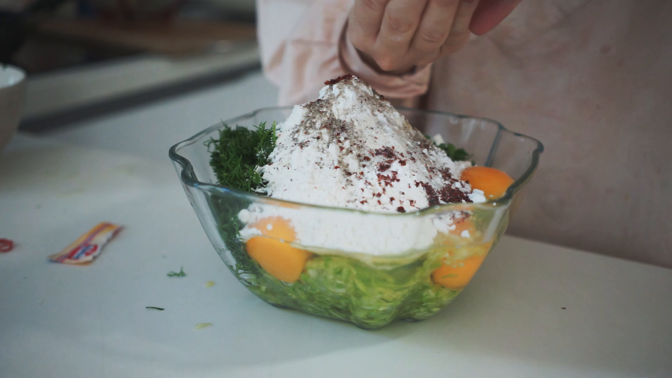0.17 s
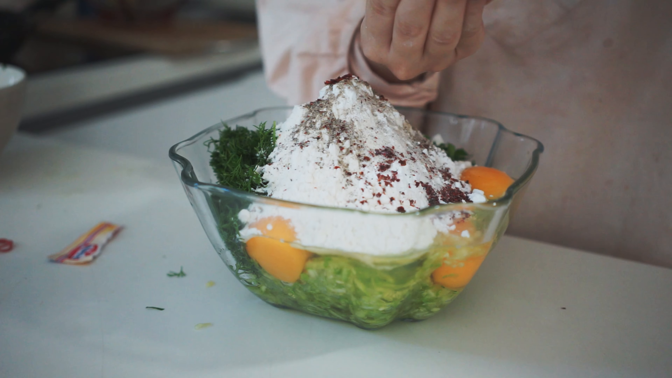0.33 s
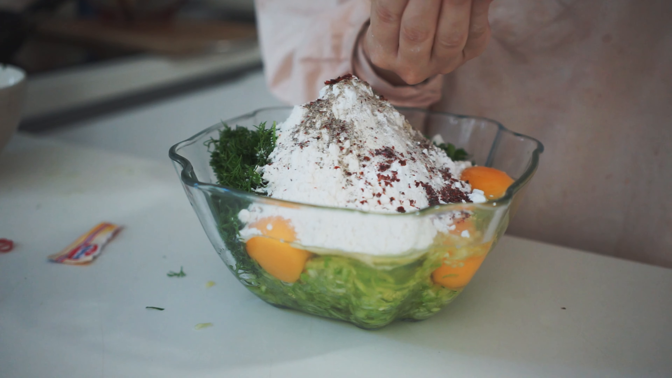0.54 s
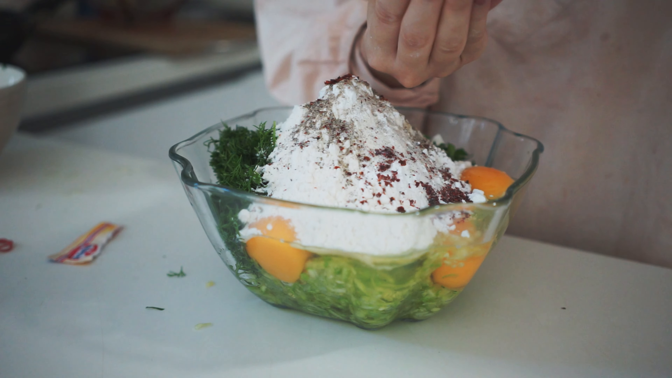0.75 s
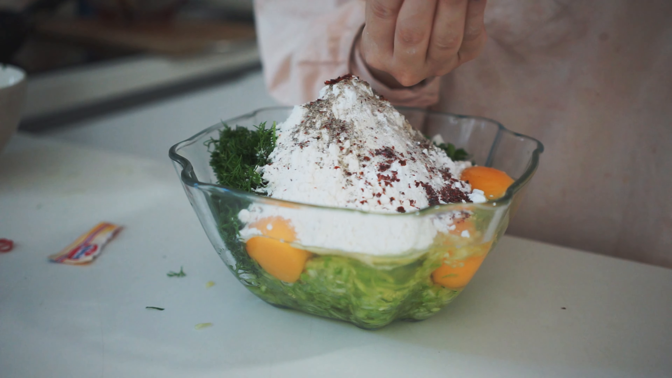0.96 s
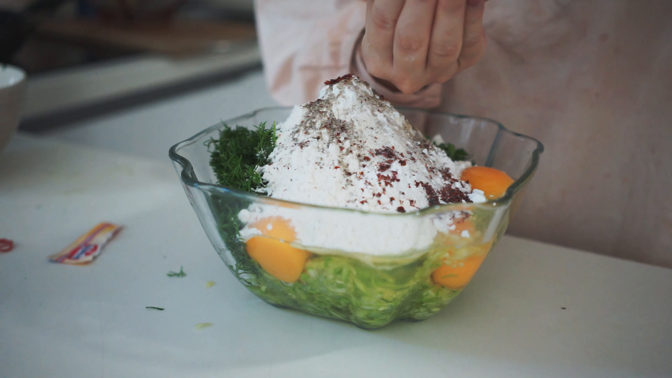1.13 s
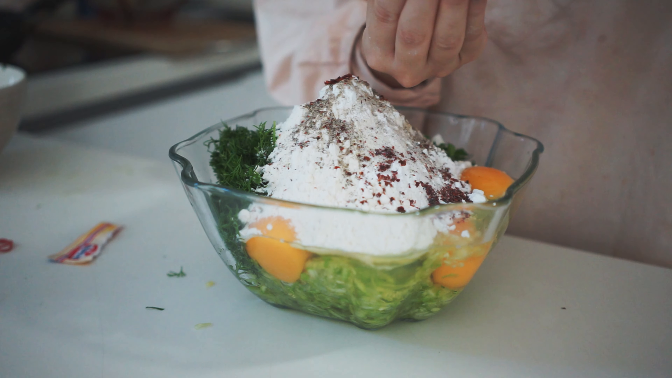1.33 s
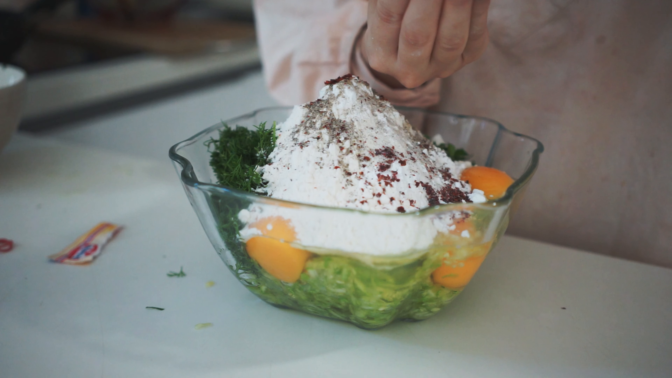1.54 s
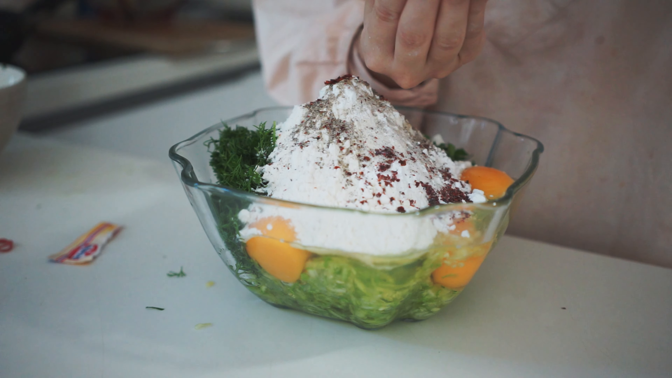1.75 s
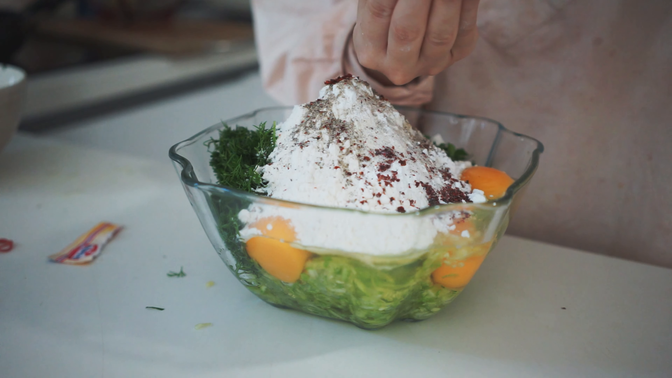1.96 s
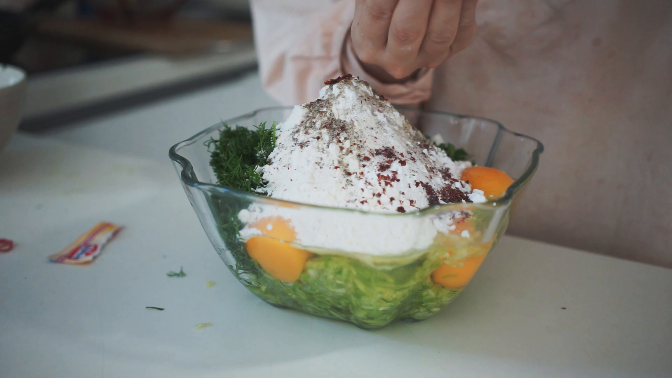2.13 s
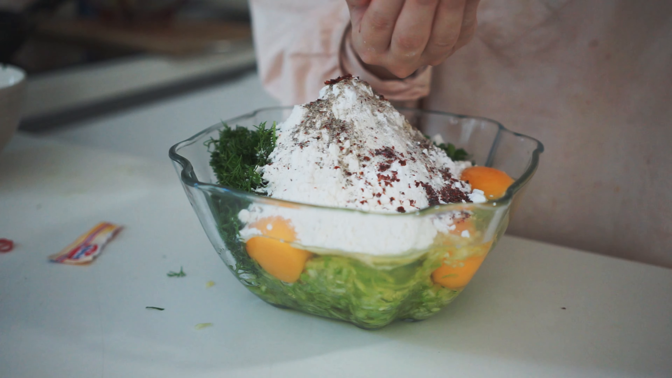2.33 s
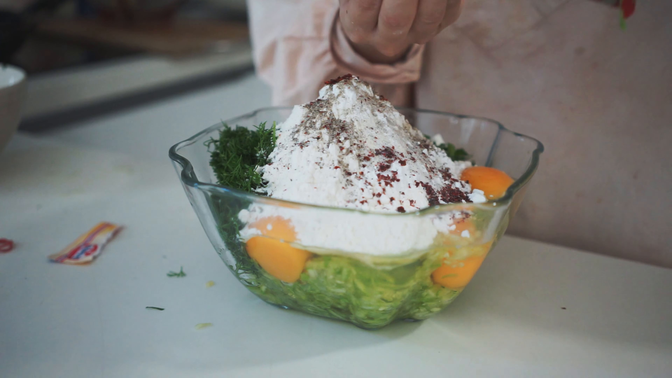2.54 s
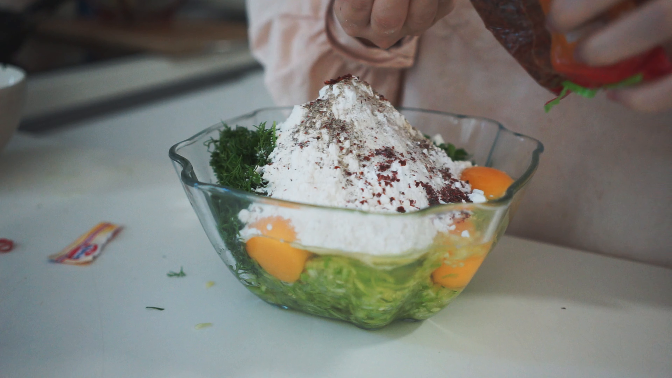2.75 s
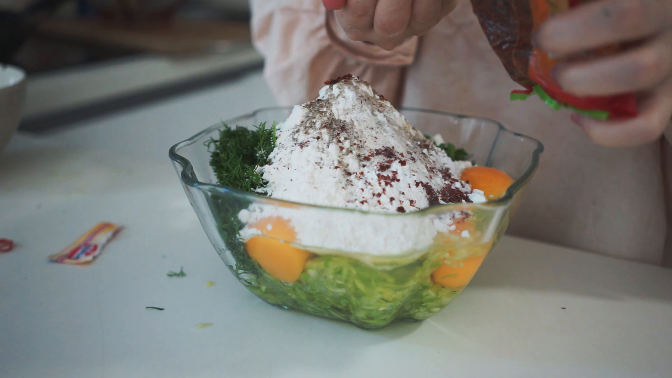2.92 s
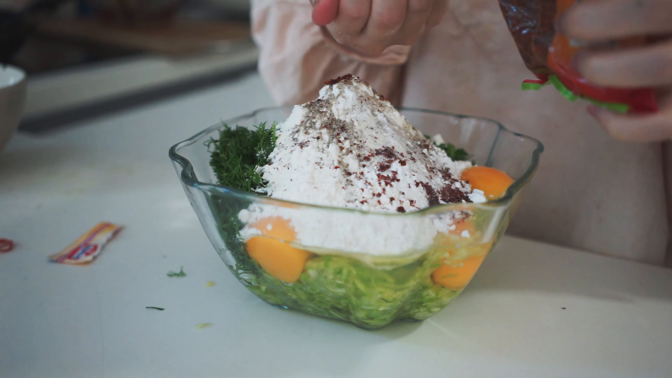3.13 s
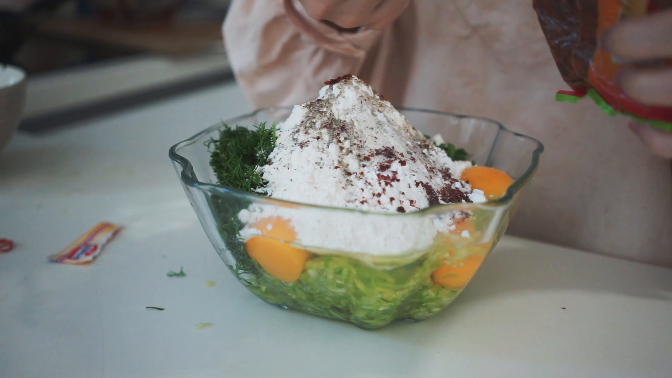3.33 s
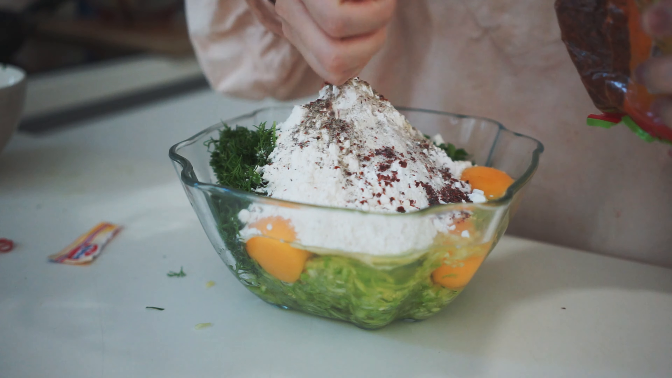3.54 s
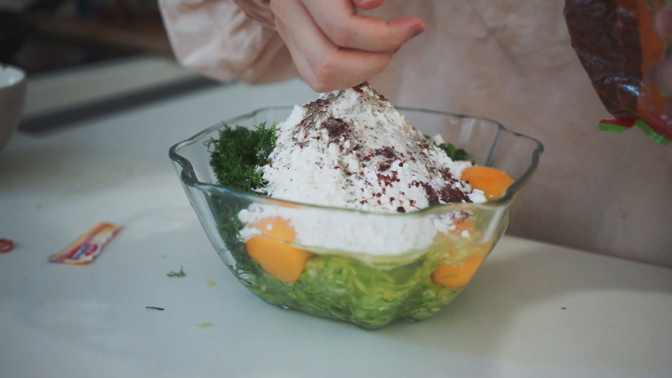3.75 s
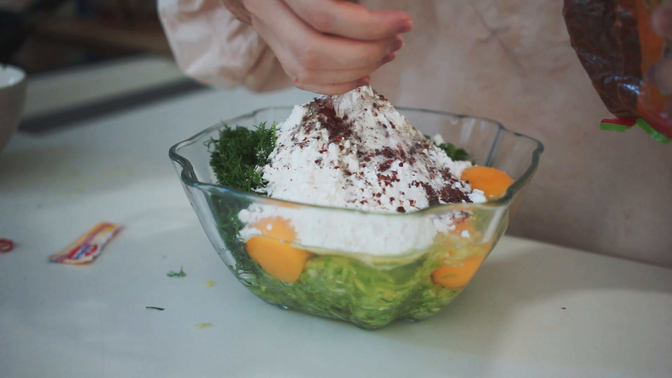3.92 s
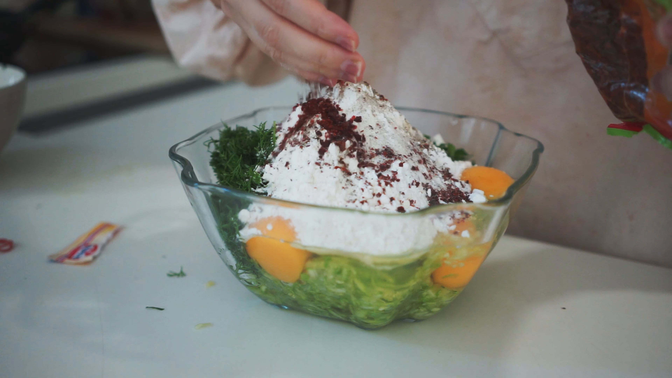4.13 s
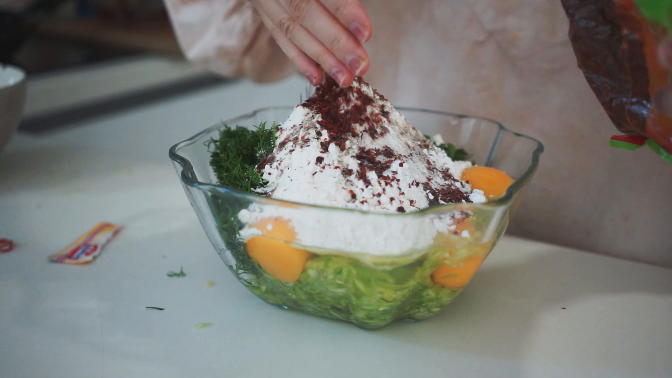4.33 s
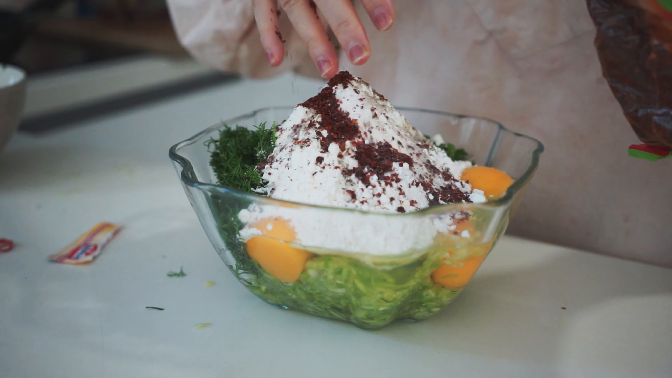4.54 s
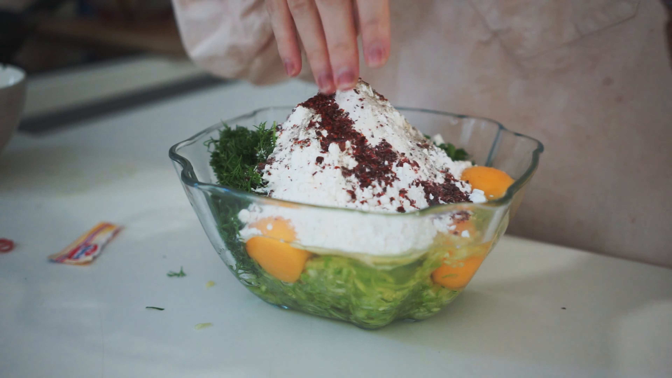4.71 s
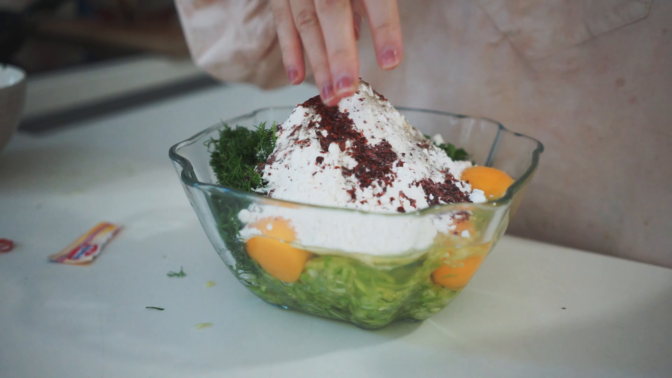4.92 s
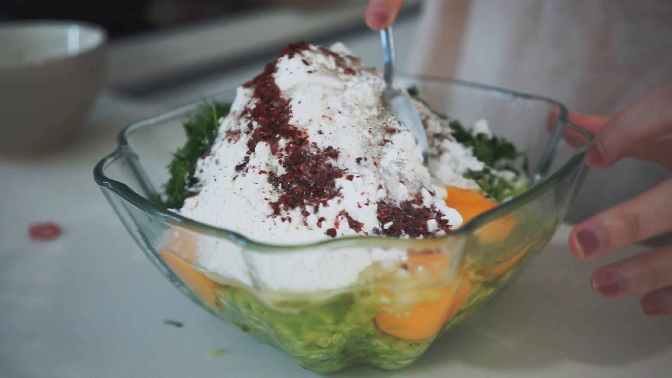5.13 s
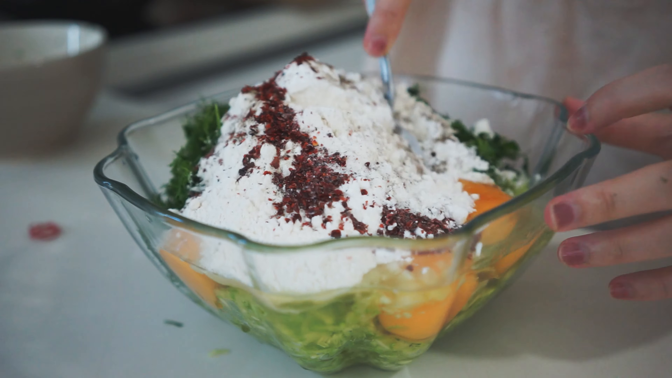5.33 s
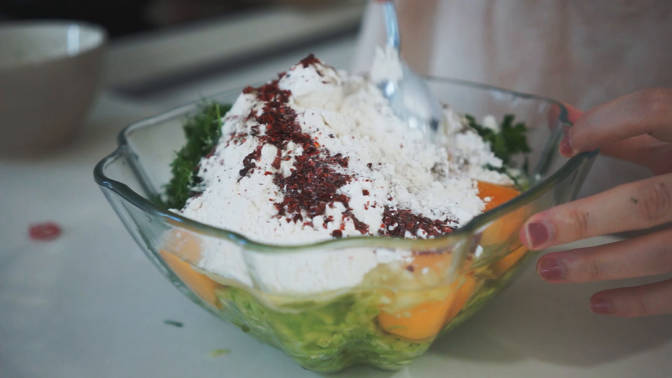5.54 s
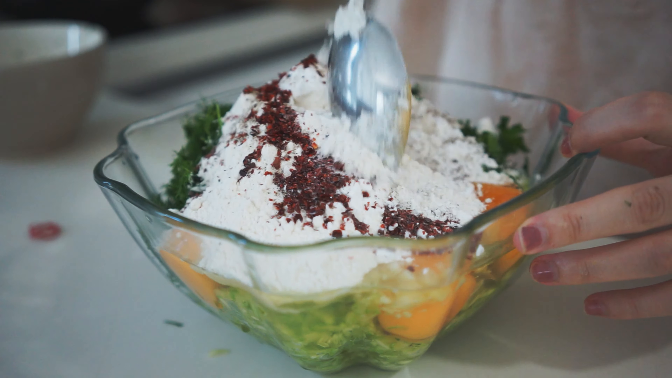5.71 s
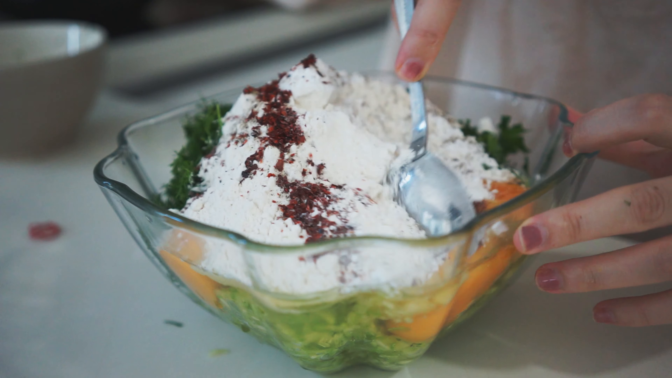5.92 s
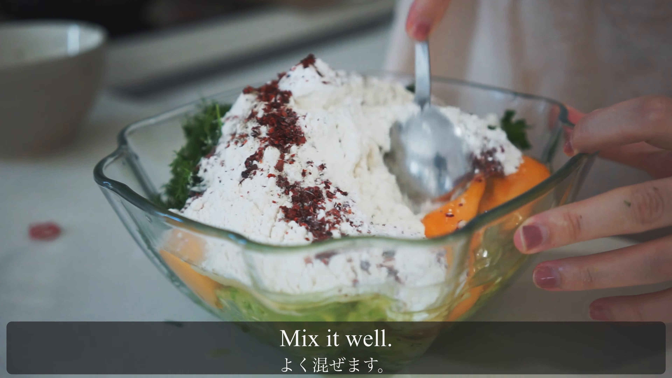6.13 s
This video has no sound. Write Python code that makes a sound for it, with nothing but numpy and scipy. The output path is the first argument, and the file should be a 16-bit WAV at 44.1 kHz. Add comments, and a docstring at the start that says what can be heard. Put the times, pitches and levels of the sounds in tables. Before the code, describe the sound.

Brittle dry leaves are rubbed between fingers close to a stereo microphone, slightly brighter on the right, over soft room air and a faint low hum that soon fades. The rubbing dwindles, a short grainy pour comes from a bag, then almost nothing but tiny distant contacts. A dry crunch precedes dull knocks of a spoon against a loaded glass bowl, with short room echo and a last hard clink.

```python
"""In a small kitchen, fingers crumble dry flakes over a bowl of flour, then more flakes slide out of a bag.
Crackle is thousands of tiny random fractures; bigger flakes each ring for a cycle or two.
A few faint ticks and chinks, heard only as reflections, come from across the room, over steady air and a low hum.
A spoon bumps the heavy glass bowl on the counter, then ploughs through the mixture and strikes the bare glass:
each blow sets off dying sine tones and bursts of fading noise."""
import sys
import numpy as np
from scipy import signal
from scipy.fft import rfft, irfft
from scipy.io import wavfile
from scipy.ndimage import uniform_filter1d

SR = 44100
rng = np.random.default_rng(int(sys.argv[2]) if len(sys.argv) > 2 else 0)


def int16_out(signal):
    """Quantize to a 16-bit WAV file."""
    q = np.round(np.clip(np.atleast_2d(signal).T, -1, 1) * 32767)
    wavfile.write(sys.argv[1], SR, q.astype(np.int16))


N = 276495  # length in samples

# Levels in dB are relative: later mixing steps may raise or lower them.
# The colour of the steady room noise. Each row: frequency in Hz, level in dB per Hz.
AIR_COLOUR = [(15, -39), (25, -10.5), (102, -4), (190, -5.5), (217, -10.5), (242, -8.5), (405, -12),
              (591, -12.5), (677, -13.5), (734, -14), (1330, -17), (2110, -19.5), (2480, -20.5),
              (3250, -21), (16000, -28.5)]
AIR_DB = -56
# How alike the room noise is at left and right. Each row: frequency in Hz, likeness (1 = the same).
AIR_LIKENESS = [(60, 0.93), (120, 1), (220, 0.8), (400, 0.46), (1500, 0.16), (15000, 0.23)]
# A low hum that swells once and then dies away. Each row: time in seconds, level in dB.
HUM_LEVEL = [(0, -60), (.8, -59.5), (1.27, -54), (1.4, -63), (2.3, -67.5), (6.3, -85)]
HUM_HZ = 61
# How fast the room's echo dies. Each row: frequency in Hz, time to fall by 60 dB in seconds.
ROOM_T60 = [(100, 0.19), (300, 0.42), (1000, 0.37), (3000, 0.38), (8000, 0.39), (16000, 0.23)]
EDGE_HZ = 16100  # the top of the treble

# Faint ticks far off in the room. Each row: start in seconds, strength in dB, centre in Hz, width in octaves.
FAR_TICKS = [(3.780, -15, 7500, 1.15), (4.230, -13.5, 3600, 1.1), (4.4004, -11.5, 4370, 1.32),
             (4.505, -16.5, 4130, 1.24), (4.62, -22, 3930, 3.3)]
# The colour the far ticks share. Each row: frequency in Hz, level in dB.
FAR_TICK_COLOUR = [(700, 10), (1300, 5), (2500, -1), (4000, -2), (5600, 3), (6800, -5), (8800, -1.5),
                   (10800, -2), (13000, -1), (16000, -7)]
# Two light chinks far off. Each row: start in seconds, strength in dB.
FAR_CHINKS = [(5.552, -19.5), (5.633, -16)]
# The colour of the chinks, with a few narrow peaks. Each row: frequency in Hz, level in dB.
CHINK_COLOUR = [(300, -42), (3400, -13), (4100, -1), (4900, -12), (5800, -2), (6700, -14), (8200, 4),
                (9200, -5), (10200, -6), (11300, -13), (13000, -2), (14300, -13), (15400, -5), (16500, -15)]
# Soft bumps of arm and bag against the counter.
# Each row: start in seconds, peak level in dB, frequency in Hz, length in seconds.
BUMPS = [(3.82, -52, 169, 0.13), (3.842, -54, 256, 0.08), (4.272, -54, 53, .22), (4.279, -58, 91.3, 0.29)]

# The spoon meets the bowl.
# Each row: start in seconds, thud in dB, hardness of the blow in Hz, glass clink in dB.
KNOCKS = [(5.2596, -3.5, 1240, -34), (5.2963, -6.5, 497, -43), (5.318, -6.5, 198, -50),
          (5.3725, 10.5, 1380, -14.5), (5.9167, 1, 930, -7), (6.258, -5.5, 3400, 8.5)]
# Tones of the full bowl on the counter. Each row: frequency in Hz, level in dB, time to fall by 60 dB in seconds.
BOWL_MODES = [(87, -6.5, 0.19), (99, 0.5, 0.13), (141.3, -1.5, 0.39), (217, -8, 0.19), (259.7, 2.5, 0.21),
              (296, 3, 0.12), (353, -1, 0.084), (390, 3.5, 0.18), (522, 4, 0.26), (653, 1, 0.12),
              (690, -2, 0.1), (798, 1, 0.17), (850, -4, 0.15), (990, 2.5, 0.075), (1135, -4.5, 0.19),
              (1253, -4, 0.22), (1370, -5, 0.11), (1534, 2.5, 0.14), (1950, -5, 0.22), (2105, 7.5, 0.059)]
# Tones of the steel spoon against the glass wall.
# Each row: frequency in Hz, level in dB, time to fall by 60 dB in seconds.
GLASS_MODES = [(992, -1, 0.047), (2050, 14, 0.011), (2980, -9.5, 0.12), (3394, 2.5, 0.0087),
               (4760, 0, 0.038), (5210, 1, 0.023), (6200, -2, 0.023), (7680, -5, 0.0081),
               (9600, -24, 0.015)]
# The colour of the dense rumble through the counter. Each row: frequency in Hz, level in dB.
COUNTER_COLOUR = [(40, -21), (75, -2), (130, 2.5), (250, 5.5), (400, -2), (700, -4.5), (1500, -4),
                  (2300, -3), (3500, -8), (8000, -74)]
# The clatter of the many weaker glass tones. Each row: frequency in Hz, level in dB.
CLATTER_COLOUR = [(300,-30), (1000,5), (2000,3.5), (3100,7.5), (3900,-12), (4700,-2), (6500,0), (7400,-9),
                  (16000,-27)]
CLINK_REACH = 4.3  # the clink reaches this many times higher than the blow's hardness

# Flakes sliding out of the bag. Each row: time in seconds, level in dB.
POUR_LEVEL = [(2.6, -64), (2.68, -51), (2.8, -49), (3.01, -52), (3.045, -49), (3.16, -45), (3.3, -53.5),
              (3.55, -61.5), (3.72, -84)]
# The bag's hollow colour. Each row: frequency in Hz, level in dB.
BAG_COLOUR = [(150,-5.5), (700,-12), (1400,-10.5), (1900,0), (2400,-1.5), (3400,-2.5), (4700,-0.5),
              (7500,-1), (11000,-1.5), (16000,-6)]
# A short dry crunch of crackle that sags for 40 ms and then is cut off.
CUT_CRUNCH_S, CUT_CRUNCH_LENGTH_S, CUT_CRUNCH_EDGE_S = 5.083, .04, .003
CUT_CRUNCH_DB, CUT_CRUNCH_SAG_DB_PER_S = -40, 232
# The colour of this crunch. Each row: frequency in Hz, level in dB.
CUT_CRUNCH_COLOUR = [(500,-35), (1600,-10), (2100,2), (2800,-0.5), (3500,-8), (4600,-2), (6500,-4.5),
                     (9000,-13), (16000,-21)]

# Steady rubbing, which thins out as the fingers empty. Each row: time in seconds, level in dB.
RUB_LEVEL = [(0, -41), (.08, -52), (.3, -42.5), (.5, -40), (.78, -43), (1.14, -42.5), (1.22, -48.5),
             (1.48, -47), (1.68, -55), (2.15, -64.5), (2.45, -62), (2.7, -78)]
# Harder squeezes of the fingers. Each row: time in seconds, level in dB, fizz above that level in dB.
SQUEEZES = [(0.115, -40.5, -6), (0.595, -43.5, 1.5), (0.69, -42, 2.5), (0.83, -44, -1), (0.885, -55, 4),
            (1.40, -42.5, -8), (1.51, -51, 3), (1.613, -44.5, 4.5), (1.723, -42.5, -5), (1.83, -46, -4.5),
            (1.942, -47.5, -6), (2.105, -51.5, -3)]
SQUEEZE_RISE_S, SQUEEZE_HOLD_S, SQUEEZE_T60 = 0.031, 0.034, .16  # seconds
FIZZ_DB, CRUNCH_DB = -3.5, -9  # compared with the rustle of the rubbing
FULL_DB, CRUNCH_FOLLOWS = -44, 0.85  # level with full fingers; dB the crunch falls per dB of rustle
# The spoon ploughs through the mixture, louder until just before it meets the glass.
PLOUGH_S, PLOUGH_RISE_S, PLOUGH_DB, PLOUGH_FIZZ_DB, PLOUGH_CRUNCH_DB = 6.21, 0.11, -59.5, -7, 5
# The low part of the crackle. Each row: frequency in Hz, level in dB.
CRUNCH_COLOUR = [(50, -20), (120, 14.5), (200, 5.5), (350, -1), (500, -5.5), (750, -9.5), (1200, -1.5),
                 (1700, -8.5), (3000, -53.5)]
# The middle part of the crackle. Each row: frequency in Hz, level in dB.
RUSTLE_COLOUR = [(700, -29), (1300, -18.5), (1800, -5.5), (3000, -0.5), (5000, 1.5), (6500, 2.5),
                 (9000, -11.5)]
# The high part of the crackle. Each row: frequency in Hz, level in dB.
FIZZ_COLOUR = [(4500, -33.5), (7000, 5.5), (9500, -3), (12000, -5.5), (16000, -14.5)]

# Single snaps of breaking flakes, mostly loud, with a few faint ones late.
# Each row: start in seconds, strength in dB, ring in Hz, sharp tick compared with the ring in dB.
SINGLE_SNAPS = [(0.1143, -5, 1910, 9.5), (0.1291, -8, 3550, 3), (0.2552, -12, 3440, -18),
                (0.3751, -6, 4100, 9), (0.597, -3, 1960, 7.5), (0.6835, -12, 1550, -4),
                (0.6877, -6.5, 2870, 1), (0.8236, -6, 1350, 6), (0.8588, -3, 4060, -26),
                (0.885, 0, 3700, 3), (0.979, -6, 1570, -5), (1.1084, -7.5, 3570, -25),
                (1.1515, -8.5, 2690, -20), (1.1557, -12.5, 1260, -20), (1.4018, -9.5, 3100, -17),
                (1.4178, -7.5, 1230, 3), (1.4549, -6.5, 1660, -2), (1.467, -7.5, 10030, -10),
                (1.5003, -8.5, 4270, -22), (1.5191, -3, 4000, -5), (1.626, -11.5, 4360, -16),
                (1.8131, -13.5, 2740, -16), (1.926, -15.5, 3270, -25), (1.9882, -12.5, 1030, -5),
                (2.099, -8, 5200, -15), (2.2, -17.5, 9300, 1), (2.4837, -1.5, 4480, 1),
                (2.9265, -19, 2740, -17), (3.047, -16, 2260, -1), (3.1065, -19.5, 2410, -14),
                (4.1691, -26, 7100, -14), (5.0279, -27.5, 1830, -9), (5.0828, -22, 2330, -24),
                (5.2099, -26, 4420, -4)]
# The colour all breaking flakes share. Each row: frequency in Hz, level in dB.
SNAP_COLOUR = [(100, -2.5), (500, -3.5), (800, 1), (1400, 3.5), (3000, 0), (3700, -1.5), (4600, 0),
               (6200, 0), (9000, -1), (12000, -3.5), (16000, -10)]
# Smaller flakes break at random, the more weakly the quieter the crackle around them.
SMALL_PER_S, SMALL_DB, SMALL_SPREAD_DB = 25, -16, 3
SMALL_FOLLOWS = 0.56  # dB of strength per dB of crackle
SMALL_HZ, SMALL_OCTAVES, SMALL_TICK_DB = 4320, 0.41, -7.5  # ring, its scatter either way, sharp tick
SMALL_BAG_HZ, SMALL_BAG_DB = 2400, -8  # in the bag they ring lower and softer
# The hands as heard at the left, with less treble. Each row: frequency in Hz, level in dB.
LEFT_SHADE = [(200, 1), (700, -2), (1500, -4), (4000, -1.5), (9000, -8), (16000, -9)]


def gain_of(db):
    """Turns decibels into amplitude."""
    return 10 ** (np.asarray(db) / 20)


def evened(x):
    """Scales to an average (rms) strength of 1."""
    return x / np.sqrt(np.mean(x ** 2) + 1e-20)


def unit(x):
    """Scales to a total energy of 1."""
    return x / np.sqrt(np.sum(x ** 2) + 1e-20)


def read(points, hz):
    """Reads a table between its rows, on a log-frequency axis."""
    f, value = np.transpose(points)
    return np.interp(np.log(hz + 1), np.log(f + 1), value)


def coloured(x, points):
    """Filters by a colour table with minimum phase, so that nothing sounds before its cause."""
    size = 4096
    log_gain = np.log(gain_of(read(points, abs(np.fft.fftfreq(size, 1 / SR)))))
    response = np.exp(np.conj(signal.hilbert(log_gain)))
    taps = np.fft.ifft(response).real[:size // 2]
    return signal.oaconvolve(x, taps)[:len(x)]


def band(x, low_hz, high_hz, order):
    """Keeps what lies between two frequencies."""
    sections = signal.butter(order, [low_hz, high_hz], "band", fs=SR, output="sos")
    return signal.sosfilt(sections, x)


def add(mix, s, sound):
    """Mixes a sound in at time s."""
    part = mix[max(round(s * SR), 0):][:len(sound)]
    part += sound[:len(part)]


def fading(t, t60):
    """Falls by 60 dB in t60 seconds."""
    return np.exp(-np.log(1000) * t / t60)


def swell(s, rise_s, hold_s, t60):
    """Rises to full strength at time s, holds, then dies away."""
    t = np.arange(N) / SR - s
    return np.clip(1 + t / rise_s, 0, 1) ** 2 * fading(np.maximum(t - hold_s, 0), t60)


def course(rows):
    """Follows a table of times and levels as amplitude; next to silent after its last row."""
    return gain_of(np.interp(np.arange(N) / SR, *np.transpose(rows), right=-120))


def ring(modes, t):
    """Sounds struck tones, each a dying sine."""
    return sum(gain_of(db) * fading(t, t60) * np.sin(2 * np.pi * hz * t) for hz, db, t60 in modes)


def chip(hz, cycles, t):
    """A broken flake rings for a cycle or two; taking differences sharpens its start."""
    return unit(np.diff(np.exp(-t * hz / cycles) * np.sin(2 * np.pi * hz * t), prepend=0))


def crackle(per_s, spread_db, cycles):
    """Thousands of tiny fractures a second, mostly small, each with one of 24 pitches."""
    t, pitches = np.arange(256) / SR, np.geomspace(600, 14000, 24)
    out = np.zeros(N)
    for hz in pitches:
        sizes = gain_of(spread_db * np.minimum(rng.exponential(1, N), 5))
        happens = rng.random(N) < per_s / len(pitches) / SR
        breaks = sizes * rng.choice([-1, 1], N) * happens
        out += signal.oaconvolve(breaks, chip(hz, cycles, t))[:N]
    return out


def air():
    """Steady room noise, most alike on both sides in the bass."""
    hz = np.fft.rfftfreq(N, 1 / SR)
    left, other = rfft(rng.standard_normal((2, N)))
    same = np.clip(read(AIR_LIKENESS, hz), -1, 1)
    right = same * left + np.sqrt(1 - same ** 2) * other
    sides = np.array([left, right]) * gain_of(read(AIR_COLOUR, hz))
    return gain_of(AIR_DB) * evened(irfft(sides, N))


def hum(waver=0.31):
    """A low tone whose strength wavers with smoothed noise."""
    t = np.arange(N) / SR
    smooth = uniform_filter1d(rng.standard_normal(N), size=4000)
    drift = evened(uniform_filter1d(smooth, size=4000))
    return course(HUM_LEVEL) * evened((1 + waver * drift) * np.sin(2 * np.pi * HUM_HZ * t))


def room(x, gap_s=.004):
    """Dense reflections, different at each side, every band dying at its own speed."""
    taps = rng.standard_normal((2, SR)) * (rng.random((2, SR)) < 6000 / SR)
    hz, t, spectrum = signal.stft(taps, SR, nperseg=256)
    decay = fading(t, read(ROOM_T60, hz)[:, None])
    tail = signal.istft(spectrum * decay, SR, nperseg=256)[1]
    tail *= np.arange(tail.shape[1]) / SR > gap_s
    return np.array([signal.fftconvolve(x, unit(side))[:N] for side in tail])


def far_sounds():
    """Single sharp contacts: the ticks each in a broad band, the chinks in a few narrow ones."""
    out, hz = np.zeros(N), np.geomspace(100, 20000, 60)
    click = signal.unit_impulse(4096)
    for s, db, centre_hz, octaves in FAR_TICKS:
        band_db = -10 * np.log10(1 + (np.log2(hz / centre_hz) / octaves) ** 4)
        colour = np.c_[hz, band_db + read(FAR_TICK_COLOUR, hz)]
        add(out, s, gain_of(db) * unit(coloured(click, colour)))
    for s, db in FAR_CHINKS:
        add(out, s, gain_of(db) * unit(coloured(click, CHINK_COLOUR)))
    return out


def bumps():
    """Padded contacts: a low swing that swells and fades."""
    out = np.zeros(N)
    for s, db, hz, length_s in BUMPS:
        t = np.arange(0, length_s, 1 / SR)
        swing = np.sin(2 * np.pi * (hz * t + rng.random()))
        add(out, s, gain_of(db) * np.hanning(len(t)) * swing)
    return out


def knocks(rumble_db=-3, rumble_t60=0.4, push_db=-4, push_hz=480, push_t60=0.0017,
           lowest_hz=66, clatter_db=-4, clatter_t60=0.13):
    """Flour cushions the spoon, so the bowl thuds; where steel reaches glass it clinks."""
    out, t = np.zeros(N), np.arange(SR * 3 // 4) / SR
    for s, thud_db, hard_hz, clink_db in KNOCKS:
        rumble = coloured(rng.standard_normal(len(t)) * fading(t, rumble_t60), COUNTER_COLOUR)
        clatter = coloured(rng.standard_normal(len(t)) * fading(t, clatter_t60), CLATTER_COLOUR)
        # the whole bowl is shoved briefly
        push = ring([(push_hz, 0, push_t60)], t)
        # neighbouring modes swing in opposite directions at the rim
        modes = ring(BOWL_MODES[::2], t) - ring(BOWL_MODES[1::2], t)
        body = unit(modes) + gain_of(rumble_db) * unit(rumble) + gain_of(push_db) * unit(push)
        # a soft blow hardly excites the upper modes
        thud = band(body, lowest_hz, max(hard_hz, 2 * lowest_hz), order=3)
        clink = unit(ring(GLASS_MODES, t)) + gain_of(clatter_db) * unit(clatter)
        clink = band(clink, lowest_hz, min(CLINK_REACH * hard_hz, EDGE_HZ), order=2)
        add(out, s, gain_of(thud_db) * unit(thud) + gain_of(clink_db) * unit(clink))
    return out


def pouring():
    """Flakes tumble along the wall of the bag: crackle in the bag's colour."""
    grains = crackle(per_s=4500, spread_db=3.0, cycles=0.65)
    return course(POUR_LEVEL) * evened(coloured(grains, BAG_COLOUR))


def cut_crunch(crack_db=-12):
    """One dry crack and a dense burst of crackle that sags and is cut off."""
    t = np.arange(N) / SR - CUT_CRUNCH_S
    gate = np.clip(np.minimum(t, CUT_CRUNCH_LENGTH_S - t) / CUT_CRUNCH_EDGE_S + .5, 0, 1)
    sag_db = CUT_CRUNCH_SAG_DB_PER_S * np.clip(t, 0, CUT_CRUNCH_LENGTH_S)
    level = gate * gain_of(CUT_CRUNCH_DB - sag_db)
    grains = crackle(per_s=18000, spread_db=3.0, cycles=0.65)
    burst = level * evened(coloured(grains, CUT_CRUNCH_COLOUR))
    crack = unit(coloured(signal.unit_impulse(SR // 20), CUT_CRUNCH_COLOUR))
    add(burst, CUT_CRUNCH_S, gain_of(crack_db) * crack)
    return burst


def finger_effort():
    """Strength of the rustle and of the fizz: steady rubbing plus the squeezes, added in power."""
    rustle = course(RUB_LEVEL) ** 2
    fizz = rustle * gain_of(FIZZ_DB) ** 2
    for s, db, fizz_db in SQUEEZES:
        squeeze = gain_of(db) * swell(s, SQUEEZE_RISE_S, SQUEEZE_HOLD_S, SQUEEZE_T60)
        rustle = rustle + squeeze ** 2
        fizz = fizz + (gain_of(fizz_db) * squeeze) ** 2
    return np.sqrt(rustle), np.sqrt(fizz)


def rubbing():
    """One crackle in three colours swells with the effort of the fingers, and later under the spoon."""
    rustle, fizz = finger_effort()
    # as the fingers empty, the low crunch falls less than the rustle
    crunch = gain_of(FULL_DB + CRUNCH_DB) * (rustle / gain_of(FULL_DB)) ** CRUNCH_FOLLOWS
    plough = gain_of(PLOUGH_DB) * swell(PLOUGH_S, PLOUGH_RISE_S, hold_s=0.024, t60=0.27)
    grains = crackle(per_s=4200, spread_db=3.5, cycles=0.66)
    parts = [(RUSTLE_COLOUR, rustle + plough),
             (FIZZ_COLOUR, fizz + gain_of(PLOUGH_FIZZ_DB) * plough),
             (CRUNCH_COLOUR, crunch + gain_of(PLOUGH_CRUNCH_DB) * plough)]
    return sum(strength * evened(coloured(grains, colour)) for colour, strength in parts)


def small_snaps():
    """Lists small breaks at uneven times, from the fingers or the bag, whichever is busier."""
    fingers, bag = finger_effort()[0], course(POUR_LEVEL)
    rows = []
    for k, (when, force, pitch) in enumerate(rng.uniform(-1, 1, size=(140, 3))):
        s = abs(k + when) / SMALL_PER_S
        if s < POUR_LEVEL[-1][0]:
            i = round(s * SR)
            if fingers[i] > bag[i]:
                level, hz, db = fingers[i], SMALL_HZ, SMALL_DB
            else:
                level, hz, db = bag[i], SMALL_BAG_HZ, SMALL_DB + SMALL_BAG_DB
            db += SMALL_FOLLOWS * (20 * np.log10(level) - FULL_DB)
            db += SMALL_SPREAD_DB * force
            rows.append((s, db, hz * 2 ** (SMALL_OCTAVES * pitch), SMALL_TICK_DB))
    return rows


def snaps(cycles=0.71, tick_hz=8000, tick_cycles=0.27, splinter_s=.0013, splinter=0.42, body_share=0.41):
    """A flake breaks with one crack and a few splinters right behind it."""
    out, t = np.zeros(N), np.arange(400) / SR
    for s, db, hz, tick_db in SINGLE_SNAPS + small_snaps():
        cracks = signal.unit_impulse(len(t))
        for delay, force in rng.random(size=(4, 2)):
            add(cracks, splinter_s * delay, np.array([splinter * (2 * force - 1)]))
        # the bending flake gives the body, its torn edge the tick
        body = unit(np.exp(-t * hz / cycles) * np.sin(2 * np.pi * hz * t))
        tick = gain_of(tick_db) * chip(tick_hz, tick_cycles, t)
        flake = chip(hz, cycles, t) + body_share * body + tick
        add(out, s, gain_of(db) * unit(np.convolve(cracks, flake)))
    return coloured(out, SNAP_COLOUR)


def near(x, bounce_db=-6, reach_s=0.0053, moves_hz=3.1, count=4):
    """Sound from the hands: brighter on the right, with quick bounces that shift as the fingers move."""
    t, sides = np.arange(256) / SR, np.array([x, x])
    for k in range(count):
        # the sets of bounces take turns
        turn = np.cos(np.pi * (2 * moves_hz * np.arange(N) / SR + k / count))
        share = np.sqrt(2 / count) * turn
        bounces = rng.standard_normal((2, len(t))) * np.exp(-t / reach_s) * (t > 0)
        bounced = np.array([signal.oaconvolve(x * share, unit(b))[:N] for b in bounces])
        sides = sides + gain_of(bounce_db) * bounced
    return np.array([coloured(sides[0], LEFT_SHADE), sides[1]])


def scene(hands_db=2.0, rub_room_db=-12.5, snap_room_db=-6, pour_room_db=-5, knock_room_db=-7):
    """Hands and bowl are close by and also ring in the kitchen; far sounds arrive by reflection only."""
    rub, snap, pour, knock = rubbing(), snaps(), pouring(), knocks()
    direct = gain_of(hands_db) * near(rub + snap + pour + cut_crunch()) + knock
    sends = [(rub, rub_room_db), (snap, snap_room_db), (pour, pour_room_db), (knock, knock_room_db)]
    reflected = room(far_sounds() + sum(gain_of(db) * sound for sound, db in sends))
    return direct + reflected + bumps() + air() + hum()


def record(dry):
    """Removes the treble above the edge frequency with a steep low-pass filter."""
    taps = signal.firwin(301, EDGE_HZ, window=("kaiser", 9), fs=SR)
    return signal.oaconvolve(dry, taps[None], "same")


dry = scene()
out = record(dry)
int16_out(out)
```